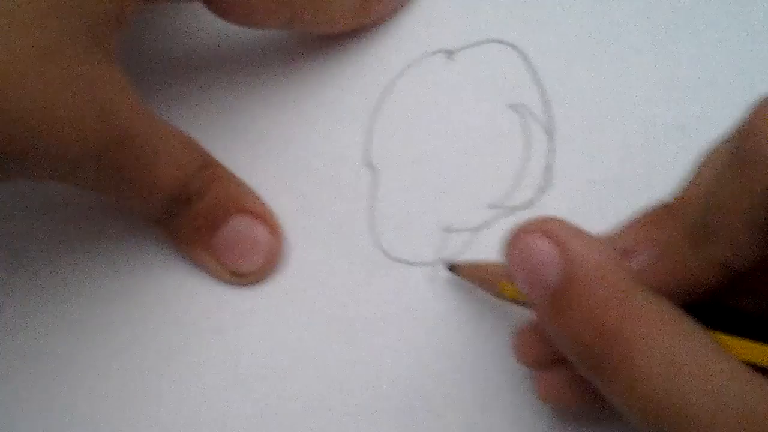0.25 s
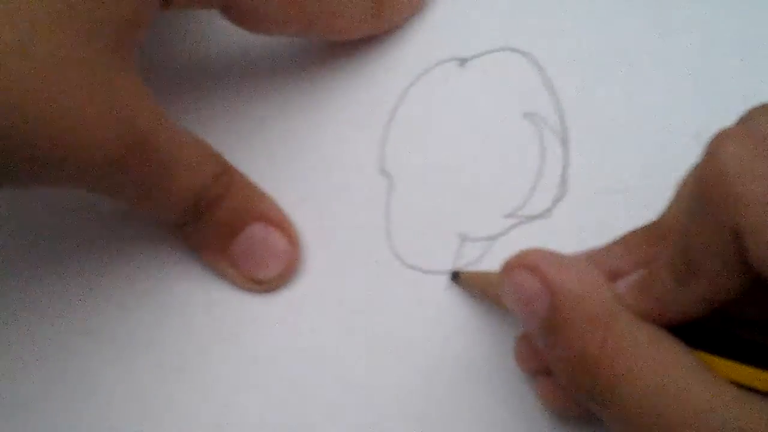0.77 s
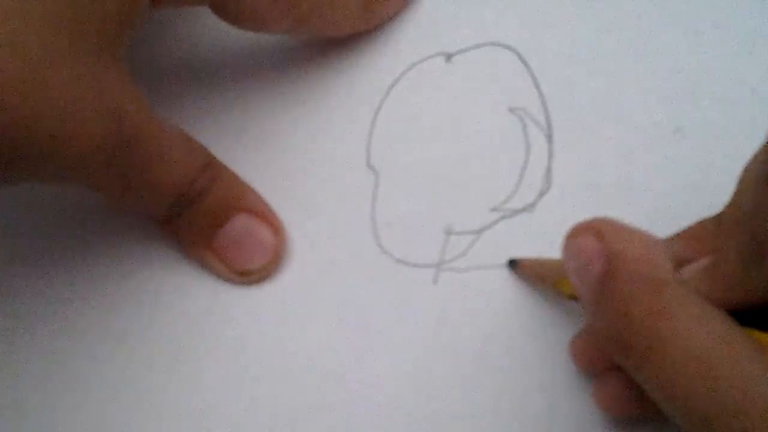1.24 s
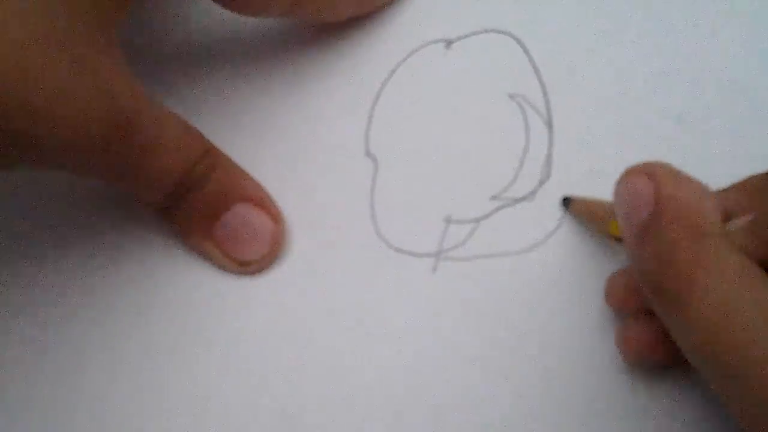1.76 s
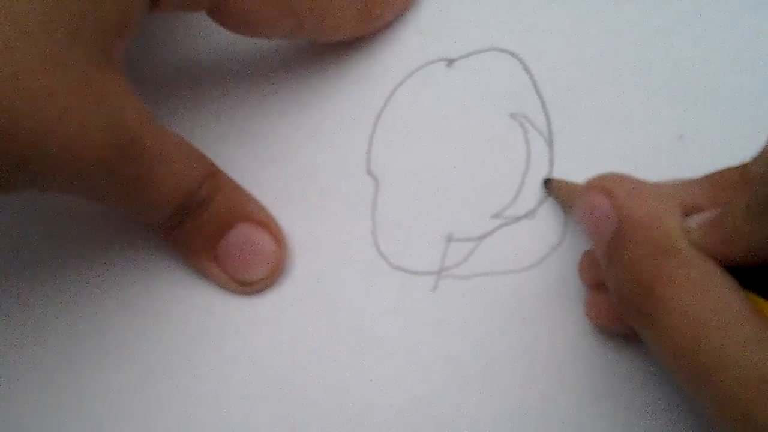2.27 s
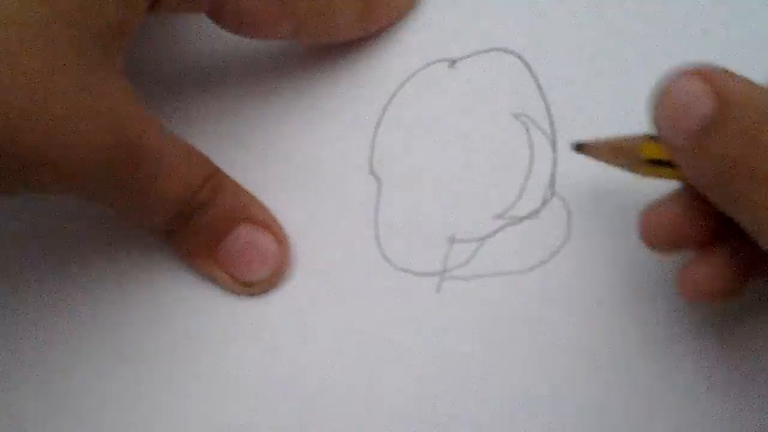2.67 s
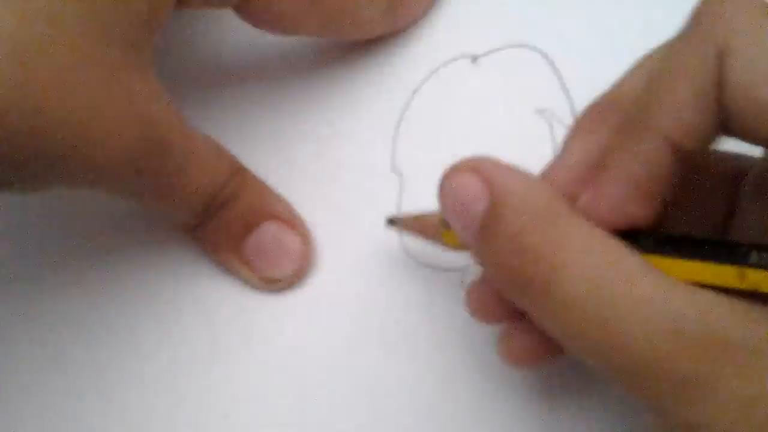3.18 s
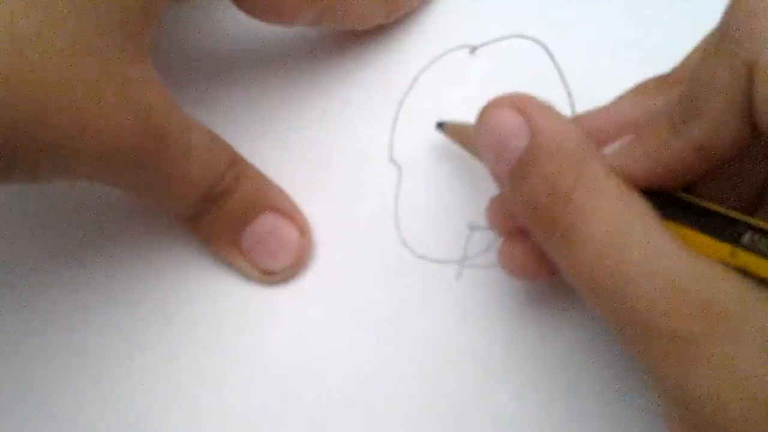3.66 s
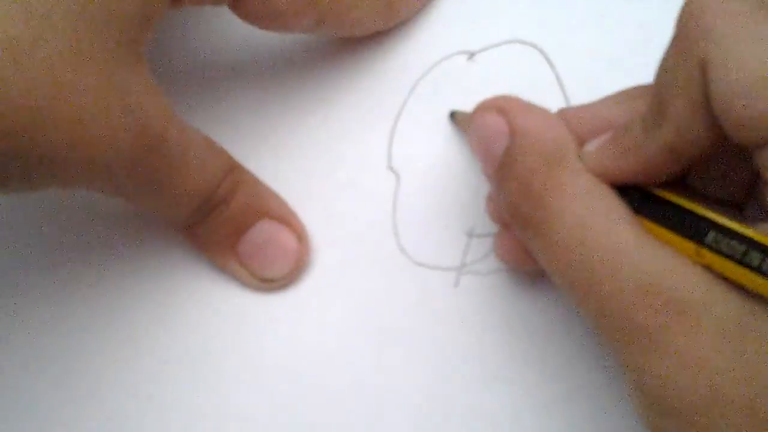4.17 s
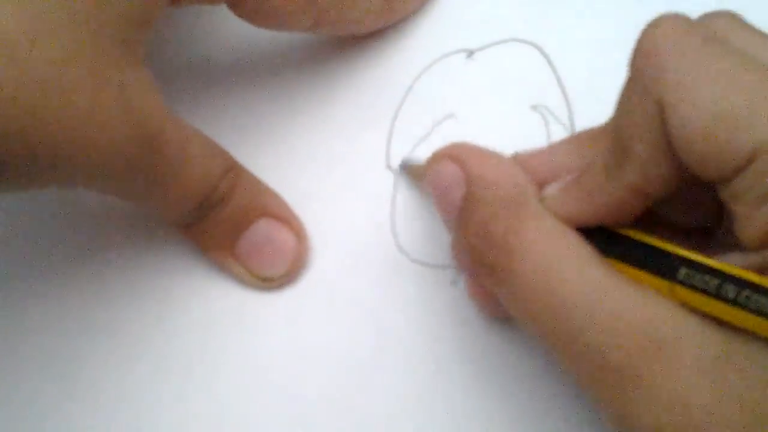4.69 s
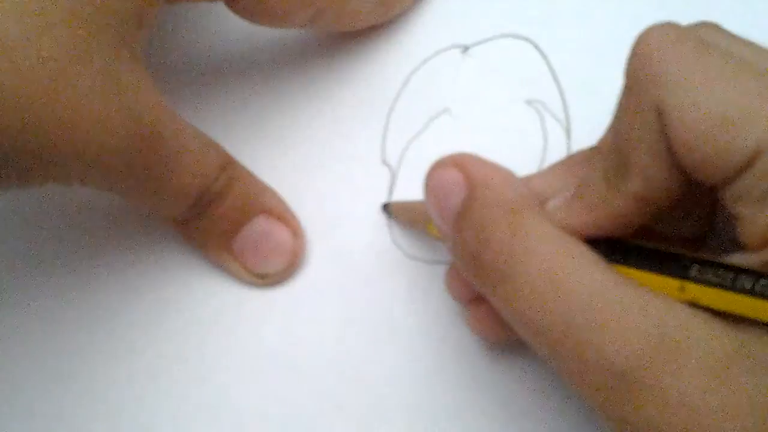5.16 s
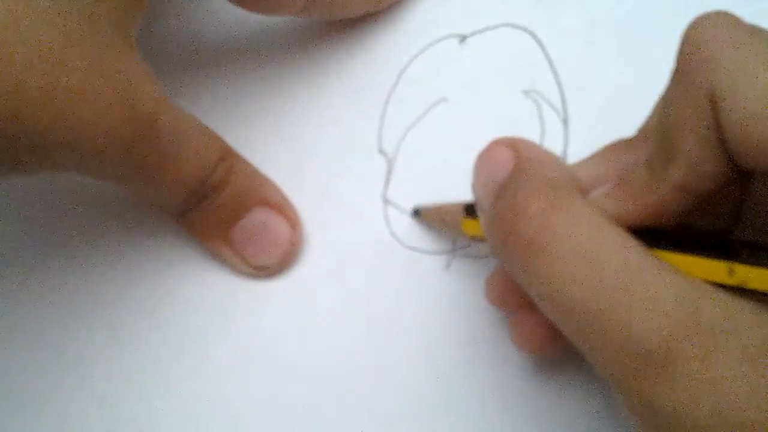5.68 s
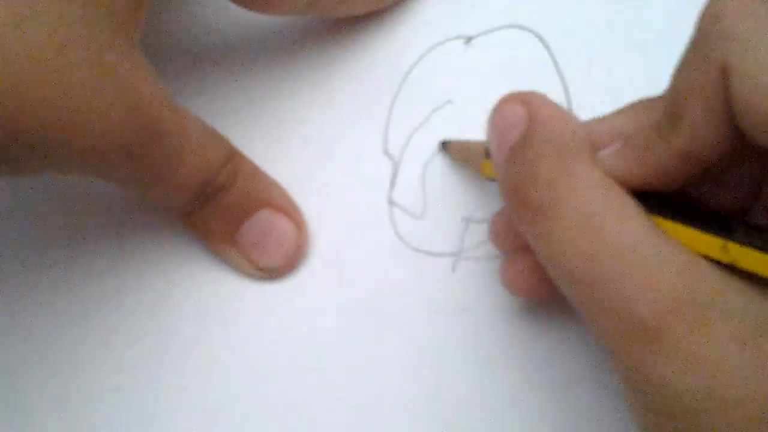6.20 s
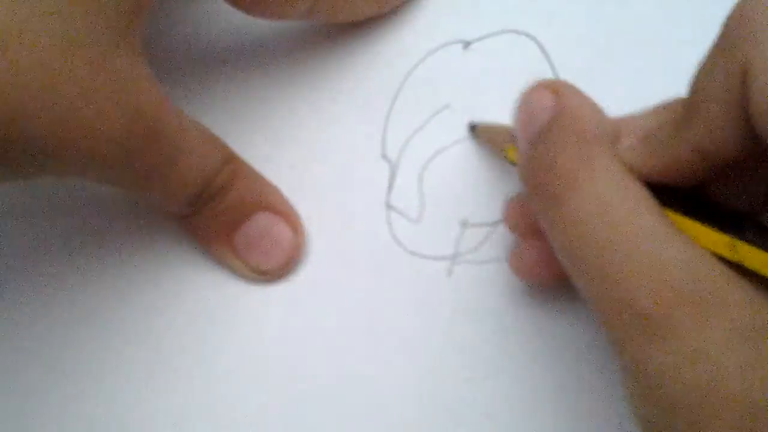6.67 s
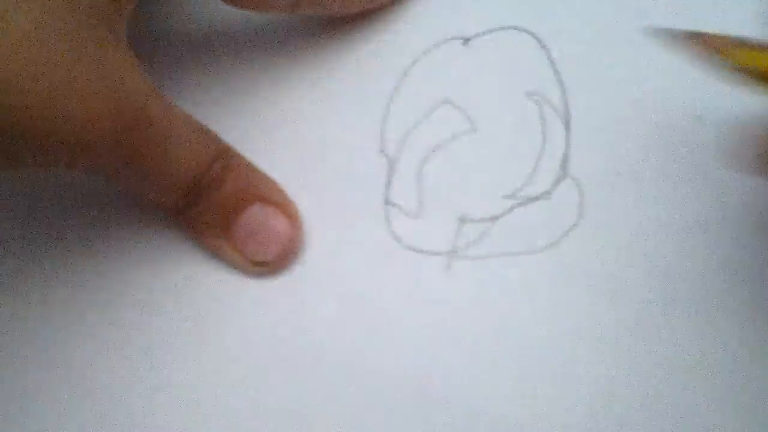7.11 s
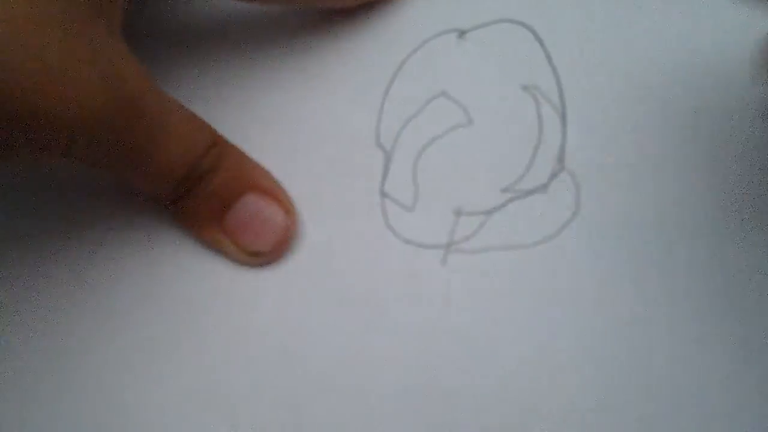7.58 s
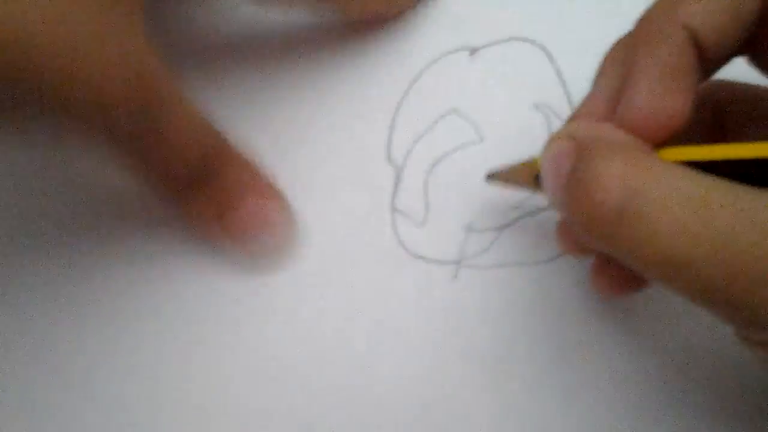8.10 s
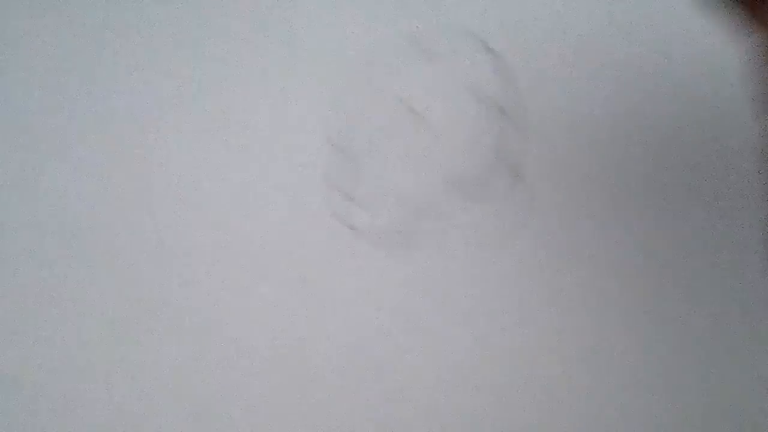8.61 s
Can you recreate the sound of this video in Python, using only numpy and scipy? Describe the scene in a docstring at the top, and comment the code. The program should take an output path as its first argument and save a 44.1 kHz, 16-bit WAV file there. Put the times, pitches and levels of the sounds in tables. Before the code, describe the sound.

A pencil scratches on paper in uneven close strokes, with small clicks, soft thuds and one sharp knock on the table near the end.

```python
"""Pencil strokes rasp and hiss over a sheet of paper on a wooden table, heard from very close.
Paper fibres catch and let go under lead and hand, the sheet snaps, the table thuds under the hand.
Near the end something hard knocks on the table, sets its modes ringing and rattles to rest.
A short, dull room tail sits far behind it all."""
import sys
import numpy as np
from scipy import signal
from scipy.io import wavfile

SR = 44100
rng = np.random.default_rng(int(sys.argv[2]) if len(sys.argv) > 2 else 0)


def output_pcm(signal):
    """Save a mono or channel-first signal as 16-bit PCM at the path in sys.argv[1].

    Samples are clipped to [-1, 1] before scaling.
    """
    pcm = np.clip(np.atleast_2d(signal).T, -1, 1) * 32767
    wavfile.write(sys.argv[1], SR, np.round(pcm).astype(np.int16))


N = 390285

# Broad resonances that colour both rub and noise floor: the lead's rasp, the sheet's rustle,
# the table's rumble. Each row: centre in Hz, width in Hz, level in dB.
RASP_BANDS = [(2200, 1660, -4), (3080, 630, 4), (3495, 1720, -2.5)]
RUSTLE_BANDS = [(912, 290, -1.14), (1350, 610, 0.5), (1820, 565, -1.2)]
RUMBLE_BANDS = [(200, 260, -6.5), (330, 134, 1.5), (454.5, 92, 1.5), (557, 116, 2), (793, 280, -5.5)]


def paper_rub(rasp_gain, rumble_gain, rustle_gain, hiss_gain, ring_gain):
    """Fine grains rasp and hiss, coarser ones shake sheet and table. Returns mono rub and stereo hiss."""
    # Resonances of the hiss and of the lead. Each row: centre in Hz, width in Hz, level in dB.
    hiss_bands = [(5380, 1140, 5.5), (6530, 1470, 8.5), (10300, 21000, 0), (14600, 1000, -14)]
    lead_bands = [(2560, 370, -3), (3260, 630, 0)]
    stutter = from_db(0.92 * drift(35) + drift(98))
    fine = grains(per_s=900, spread_db=5.0, smooth=1.37)
    middle = grains(per_s=600, spread_db=3.0, smooth=1.7)
    coarse = grains(per_s=150, spread_db=3, smooth=1.36)
    rasp = rasp_gain * resonances(filtered(fine, [1800, 4500], "band", order=3), RASP_BANDS)
    rustle = rustle_gain * resonances(middle, RUSTLE_BANDS)
    waver = from_db(0.95 * drift(7))
    rumble = rumble_gain * waver * resonances(filtered(coarse, 1200, "low"), RUMBLE_BANDS)
    ring = ring_gain * resonances(resonances(middle, lead_bands), lead_bands)
    hiss = hiss_gain * resonances(filtered(fine, 3800, "high"), hiss_bands)
    # Each microphone port also hears a hiss of its own: part follows the rub, part is steady.
    port_gain = np.hypot(stutter * hiss_gain * from_db(-4), from_db(-72))
    port_hiss = port_gain * resonances(filtered(rng.standard_normal((2, N)), 5650, "high"), hiss_bands)
    return stutter * (rasp + rustle + rumble + hiss + ring), port_hiss


def stroke_gains():
    """Strokes swell and fade in bells; powers add. Returns gains of rasp, rumble, rustle, hiss, ring."""
    # Strokes of lead and hand. Each row: time of the top in seconds, level in dB, swell and fade
    # in seconds, table rumble and treble hiss in dB relative to that level.
    strokes = [(0.024, -55.5, 0.027, 0.086, -1, -7), (0.178, -50, 0.02, 0.024, -4, -7),
               (0.222, -38.5, 0.053, 0.092, -5, -5.5), (0.288, -48.5, 0.057, 0.02, 3.5, -1),
               (0.381, -62.5, 0.046, 0.093, 2, 0), (0.509, -54, 0.047, 0.044, 1.5, -2.5),
               (0.747, -45, 0.074, 0.044, 0, -5), (0.877, -56, 0.16, 0.045, 0, -7),
               (1.012, -50.5, 0.034, 0.048, -1, -2.5), (1.105, -54, 0.45, 0.42, 1.5, -6.5),
               (1.352, -53, 0.038, 0.11, 5.5, -2), (1.431, -50, 0.043, 0.18, 3, -5),
               (1.609, -55.5, 0.26, 0.008, 1, -3), (1.675, -59.5, 0.058, 0.099, 2, -4),
               (1.824, -53, 0.13, 0.137, -0.5, -4), (1.95, -56, 0.058, 0.046, -5, -7.5),
               (2.055, -55, 0.109, 0.18, -1, -5), (2.197, -65, 0.035, 0.025, -2, -3),
               (2.284, -53, 0.058, 0.05, -0.5, -3), (2.503, -62, 0.057, 0.014, -0.5, -4),
               (2.694, -60, 0.22, 0.089, 1, -5.5), (2.777, -55.5, 0.029, 0.16, 1.5, -3.5),
               (3.026, -51, 0.096, 0.29, 1.5, -4), (3.106, -29.5, 0.048, 0.031, -10.5, -6),
               (3.269, -55.5, 0.035, 0.016, -2.5, -7), (3.383, -52.5, 0.054, 0.016, -0.5, -12),
               (3.454, -53, 0.16, 0.15, -0.5, -6.5), (3.47, -29, 0.021, 0.018, -12, -11.5),
               (3.688, -55, 0.12, 0.051, -2.5, -8.5), (3.81, -51, 0.23, 0.1, -5, -9),
               (3.849, -51, 0.02, 0.02, -15, -5), (3.933, -51, 0.036, 0.061, -5, -8),
               (3.953, -51.5, 0.12, 0.53, -5, -6.5), (4.183, -45.5, 0.032, 0.016, -8, -9.5),
               (4.269, -54.5, 0.23, 0.11, -4.5, -7), (4.282, -48.5, 0.017, 0.013, -10, -6.5),
               (4.48, -62, 0.088, 0.091, -2.5, -11.5), (4.602, -56, 0.055, 0.074, -5, -10),
               (4.697, -57.5, 0.042, 0.21, 0.5, -9.5), (4.933, -64.5, 0.036, 0.25, -2.5, -10),
               (5.245, -59.5, 0.012, 0.033, 2, -14), (5.273, -63.5, 0.16, 0.1, -1, -5),
               (5.428, -65, 0.01, 0.124, 1, -3.5), (5.559, -64.5, 0.0043, 0.26, -2, -4),
               (5.693, -63, 0.022, 0.078, -13, -14), (5.809, -59, 0.093, 0.077, 1.5, -7),
               (5.944, -64.5, 0.053, 0.5, 0, -8.5), (5.995, -53, 0.013, 0.046, -3.5, -9),
               (6.156, -51, 0.15, 0.16, -0.5, -13.5), (6.427, -58, 0.31, 0.092, 0, -8),
               (6.522, -58, 0.0091, 0.034, -6, -14), (6.589, -60, 0.087, 0.087, -3, -3),
               (6.737, -59, 0.073, 0.037, -1.5, -6), (7.002, -42, 0.076, 0.09, -4.5, -7),
               (7.074, -29, 0.04, 0.053, -13, -9), (7.118, -47, 0.354, 0.0062, 7, -12),
               (7.309, -31, 0.02, 0.048, -9, -17), (7.402, -51, 0.013, 0.016, -15, -5),
               (7.461, -47.5, 0.013, 0.12, -5, -14), (7.509, -36, 0.02, 0.045, -5, -15),
               (7.648, -54, 0.075, 0.41, 1, -12), (7.919, -56, 0.025, 0.021, -10, -7),
               (8.01, -47.5, 0.29, 0.43, -4, -7.5), (8.158, -32.5, 0.094, 0.042, -5.5, -4.5),
               (8.22, -31.5, 0.02, 0.01, -12, -7.5), (8.4, -43.5, 0.21, 0.035, 2.5, -4.5),
               (8.618, -39, 0.3, 0.12, 2.5, -6.5), (8.783, -50, 0.034, 0.053, 8.5, -5.5)]
    # The resting hand's rub between strokes. Each row: time in seconds, level in dB.
    resting_rub = [(0.0, -57), (0.14, -75), (0.6, -58.5), (1.2, -67.5), (1.7, -67.5), (2.4, -64),
                   (2.92, -83), (3.58, -79), (4.39, -80), (5.2, -70.5), (5.9, -79), (6.68, -73.5),
                   (7.2, -43.5), (7.57, -64.5), (8.2, -49), (8.85, -57.5)]
    drop_db, light_db = 20, -52     # drop one swell or fade from the top; strokes below light_db are light
    t = np.arange(0, N + 64, 64) / SR
    top_s, top_db, swell_s, fade_s, rumble_db, hiss_db = np.transpose(strokes)[:, :, None]
    bell_db = top_db - drop_db * ((t - top_s) / np.where(t < top_s, swell_s, fade_s)) ** 2
    # The resting rub joins as one more row, with a colour of its own.
    level_db = np.vstack([bell_db, np.interp(t, *np.transpose(resting_rub))])
    rumble_db = np.vstack([rumble_db, [0]])
    hiss_db = np.vstack([hiss_db, [-6.5]])
    lightness_db = np.vstack([light_db - top_db, [0]])
    rasp_db = 0.22 * hiss_db + 0.86                         # less hiss, less broad rasp
    rustle_db = 0.73 * rumble_db - 2.5                      # the sheet follows the table
    ring_db = -0.8 * hiss_db - 15 + 0.21 * lightness_db     # dull or light strokes ring more
    powers = [np.sum(from_db(level_db + colour_db) ** 2, axis=0)
              for colour_db in (rasp_db, rumble_db, rustle_db, hiss_db, ring_db)]
    return [np.interp(np.arange(N) / SR, t, np.sqrt(power)) for power in powers]


def sheet_snaps(rasp_gain):
    """The sheet snaps in bright, cracking pops, with small ones scattered along the rasp."""
    # Each row: start in seconds, peak in dB, pitch in Hz, crack in dB relative to the peak.
    snaps = [(0.0291, -26.5, 2730, -8), (0.0588, -28, 1630, -27), (0.166, -36, 1900, -5),
             (0.1969, -23.5, 3920, -1.5), (0.2231, -27, 4480, -2), (0.3884, -40, 2640, -13),
             (0.906, -40, 2440, -1), (1.0111, -33, 2070, -7), (1.2822, -39, 2280, 1),
             (1.3522, -31.5, 4290, -4), (1.3758, -33, 2790, -0.5), (1.4434, -29, 2680, -14),
             (1.5066, -25.5, 3810, -13), (1.7926, -39, 2870, 1), (1.8191, -26, 3480, -1.5),
             (1.8711, -33, 3260, -4), (1.9455, -32, 2910, -10), (3.0262, -25, 3550, -3.5),
             (3.0851, -12.5, 3200, -6), (3.4655, -13.5, 3770, -25), (3.7476, -33, 4130, -8),
             (3.7747, -31, 3730, -11), (3.7973, -26, 3670, -15), (3.8285, -25, 3450, -21),
             (3.8485, -28, 3590, -10), (3.863, -33, 3830, -6), (3.9249, -24, 3440, -11),
             (3.9437, -25, 3630, -9.5), (4.0077, -31, 2900, -7), (4.1214, -28, 2190, -9),
             (4.3437, -42, 4200, 0), (5.0461, -40, 3600, -10), (5.2415, -36, 1300, -31),
             (5.4309, -45, 3280, -10), (5.4913, -42.5, 1880, -9), (5.5619, -42, 3060, -19),
             (5.9991, -30.5, 1710, -8.5), (6.093, -33.5, 2500, -14), (6.1365, -29, 3200, -24),
             (6.177, -39, 2200, -18), (6.5822, -39, 3040, -9), (6.6136, -40.5, 2090, 1),
             (7.1339, -22, 3490, -3), (7.2199, -17.5, 4180, -31), (7.2975, -17, 3100, -22),
             (7.4047, -34, 3020, 0), (7.4623, -24.5, 1340, -26), (7.5067, -14.5, 3340, -31),
             (7.5355, -15.5, 3180, -36), (7.9138, -23, 3570, -18), (7.982, -19, 3600, -12),
             (8.1042, -20.5, 3070, -9), (8.1522, -15, 1810, -17), (8.2205, -15, 2430, -17),
             (8.6139, -26, 1430, -19), (8.6797, -26, 2050, 0), (8.6948, -37, 1300, -2)]
    small = scatter(rasp_gain, per_s=7, over_db=18, low_hz=2360, high_hz=3100, crack_db=[-12])
    return pops(snaps, cycles=5) + pops(small, cycles=5)


def table_thuds(rumble_gain):
    """The table thuds under the hand in low pops, with small ones scattered along the rumble."""
    # Each row: start in seconds, peak in dB, pitch in Hz.
    thuds = [(0.059, -32.5, 890), (0.762, -35, 594), (1.3354, -35.5, 273), (1.3607, -28.5, 474),
             (1.4371, -29, 445), (1.4585, -32.5, 380), (1.4836, -31, 364), (1.5212, -35, 344),
             (1.5512, -35, 294), (1.5989, -32, 630), (2.5587, -41.5, 450), (2.8249, -38, 536),
             (3.0843, -21, 382), (3.3798, -40, 730), (3.4636, -27, 249), (3.4862, -31, 464),
             (4.1228, -37.5, 523), (4.1548, -36.5, 486), (4.1842, -29.5, 980), (4.2755, -35.5, 626),
             (4.3203, -40, 253), (4.754, -40, 630), (5.241, -54, 600), (6.1186, -28.5, 620),
             (6.1371, -31.5, 318), (6.128, -33, 330), (6.152, -36, 298), (6.176, -34.5, 563),
             (6.3346, -39.5, 455), (7.0046, -24, 880), (7.0545, -33, 423), (7.0943, -29, 555),
             (7.1942, -29, 400), (7.2046, -27.5, 285), (7.2953, -27, 330), (7.4625, -21, 570),
             (7.4861, -30.5, 510), (7.5084, -30, 292), (7.5171, -28.5, 322), (8.1583, -27, 453),
             (8.2213, -27, 650), (8.5017, -25, 513), (8.6499, -25, 680), (8.7239, -28.5, 680),
             (8.786, -31.5, 574)]
    small = scatter(rumble_gain, per_s=6, over_db=12.5, low_hz=460, high_hz=640)
    return pops(thuds, cycles=4.6) + pops(small, cycles=2.7)


def table_knock():
    """Every bounce strikes all table modes, hard ones favour the highs; dense small contacts rattle on."""
    # The knock and its bounces. Each row: start in seconds, strength in dB, hardness in dB per two octaves.
    bounces = [(8.2485, -2, -0.5), (8.2528, -8, 1.5), (8.2601, -1, 8.5)]
    # Modes of the table top. Each row: pitch in Hz, level in dB, time to fall 60 dB in seconds.
    modes = [(338.4, -13, 0.28), (485, -12, 0.042), (579, -3, 0.12), (646, -7, 0.049), (810, -5.5, 0.027),
             (931, -12, 0.11), (1302, -12.5, 0.039), (2010, -6, 0.0063), (2400, -20, 0.017),
             (2700, -9, 0.013), (2900, -5.5, 0.01), (5000, -12, 0.005)]
    # The rattle dying away. Each row: time in seconds, level in dB.
    rattle_curve = [(8.249, -57), (8.251, -13), (8.273, -17), (8.286, -22), (8.296, -13), (8.321, -22),
                    (8.34, -26), (8.39, -35), (8.43, -46), (8.47, -73)]
    start_s, strength_db, hardness_db = np.transpose(bounces)
    at = np.round(start_s * SR).astype(int)
    contacts = envelope(rattle_curve) * grains(per_s=1500, spread_db=1.5, smooth=1.32)
    wood = np.zeros(N)
    for k, (hz, level_db, t60) in enumerate(modes):
        tilt_db = hardness_db * np.log2(hz / 1000) / 2
        strikes = np.full(N, 1e-18)
        strikes[at] = from_db(strength_db + level_db + tilt_db + rng.normal(0, 1, len(at)))
        force = strikes + 0.023 * from_db(level_db) * contacts
        r, w = from_db(-60 / (t60 * SR)), 2 * np.pi * hz / SR
        wood += (-1) ** k * signal.lfilter([0, np.sin(w)], [1, -2 * r * np.cos(w), r * r], force)
    direct_rattle = 1.75 * filtered(contacts, [250, 3100], "band", order=3)
    return filtered(wood + direct_rattle, 7500, "low")      # contact lasts long enough to dull the top


def hollow_hum():
    """The dragging hand briefly sets one hollow resonance humming."""
    # The hum's rise and fall. Each row: time in seconds, level in dB.
    hum_curve = [(6.7, -69), (6.78, -59), (6.85, -55), (6.91, -59), (6.95, -56), (7.05, -55), (7.09, -41),
                 (7.13, -70)]
    return envelope(hum_curve) * resonances(rng.standard_normal(N), [(573, 21, 0)])


def noise_floor():
    """A barely audible steady noise in the colours of the rub."""
    return from_db(-89) * resonances(rng.standard_normal(N), RUMBLE_BANDS + RUSTLE_BANDS + RASP_BANDS)


def room(x, t60_s=0.079):
    """A dull tail of dying noise, its own on each side."""
    t = np.arange(round(0.5 * SR)) / SR
    dull_noise = signal.lfilter([1], [1, -0.5], rng.standard_normal((2, len(t))))
    tail = dull_noise * from_db(-60 * t / t60_s) * (t > 0.004)
    return signal.fftconvolve(x[None], tail / np.sqrt(np.sum(tail[0] ** 2)), axes=1)[:, :N]


def grains(per_s, spread_db, smooth):
    """Tiny contacts, such as fibres catching and letting go: uneven clicks on smooth noise."""
    sizes = from_db(spread_db * np.minimum(rng.exponential(1, N), 5)) * rng.choice([-1, 1], N)
    clicks = rms_one(sizes * (rng.random(N) < per_s / SR))
    return clicks + smooth * rng.standard_normal(N)


def pops(events, cycles):
    """Each push swells fast and rings down 60 dB over `cycles`; a fourth column adds a thin crack."""
    length = 2000
    out, t = np.zeros(N + length), np.arange(length) / SR
    bursts = rng.standard_normal((len(events), length)) * np.exp(-t / 0.00052)
    cracks = 1.5 * filtered(bursts, [5000, 15000], "band")
    for (start_s, peak_db, hz, *crack_db), crack in zip(events, cracks):
        shape = from_db(-60 * t * hz / cycles) * (1 - np.exp(-4 * t * hz))
        ring = np.sin(2 * np.pi * hz * t) * shape / shape.max()
        out[round(start_s * SR):][:length] += from_db(peak_db) * (ring + sum(from_db(crack_db)) * crack)
    return out[:N]


def scatter(gain, per_s, over_db, low_hz, high_hz, crack_db=()):
    """Rows of small pops at random moments, at most over_db above the rub they come from."""
    gap, softness, pitch = rng.random((200, 3)).T
    start_s = np.cumsum(-np.log(1 - gap)) / per_s
    rub_db = 20 * np.log10(np.interp(start_s, np.arange(N) / SR, gain))
    peak_db = rub_db + over_db - 7.7 * softness
    pitch_hz = low_hz * (high_hz / low_hz) ** pitch
    return [(s, db, hz, *crack_db) for s, db, hz in zip(start_s, peak_db, pitch_hz) if s < N / SR]


def resonances(x, bands):
    """Parallel resonances with alternating signs; rms 1."""
    out = 0
    for k, (hz, width_hz, level_db) in enumerate(bands):
        r = np.exp(-np.pi * width_hz / SR)
        poles = [1, -2 * r * np.cos(2 * np.pi * hz / SR), r * r]
        out = out + (-1) ** k * from_db(level_db) * (1 - r * r) * signal.lfilter([1, 0, -1], poles, x)
    return rms_one(out)


def drift(rate_hz):
    """A smooth random wander; rms 1."""
    r = np.exp(-2 * np.pi * rate_hz / SR)
    return rms_one(signal.lfilter([1], [1, -2 * r, r * r], rng.standard_normal(N + 9000))[9000:])


def envelope(points):
    """Gain through points of seconds and dB, silent outside them."""
    return from_db(np.interp(np.arange(N) / SR, *np.transpose(points), left=-200, right=-200))


def filtered(x, hz, kind, order=2):
    return signal.sosfilt(signal.butter(order, hz, kind, fs=SR, output="sos"), x)


def from_db(db):
    return 10 ** (np.asarray(db) / 20)


def rms_one(x):
    return x / np.sqrt(np.mean(x ** 2) + 1e-20)


def scene():
    """Both ports hear the close sound, the left one sample later; each has its own hiss and room tail."""
    rasp_gain, rumble_gain, rustle_gain, hiss_gain, ring_gain = stroke_gains()
    rub, port_hiss = paper_rub(rasp_gain, rumble_gain, rustle_gain, hiss_gain, ring_gain)
    close = rub + hollow_hum() + sheet_snaps(rasp_gain) + table_thuds(rumble_gain)
    close += table_knock() + noise_floor()
    left = np.r_[0, close[:-1]]
    return np.array([left, close]) + port_hiss + from_db(-29) * room(close)


def record(dry):
    """The capsule thins the bass and adds a faint low murmur; peaks clip at full scale; the top is cut."""
    bass_hz, cutoff_hz, dc_offset = 135, 15300, -0.0003
    thinned = filtered(dry, bass_hz, "high", order=4) + from_db(-16) * filtered(dry, 60, "low", order=3)
    murmur = from_db(-89) * resonances(rng.standard_normal(N), [(35, 120, 0)])
    top_cut = signal.cheby2(20, 60, cutoff_hz, fs=SR, output="sos")
    return signal.sosfilt(top_cut, np.clip(thinned + murmur, -1, 1)) + dc_offset


dry = scene()
out = record(dry)
output_pcm(out)
```